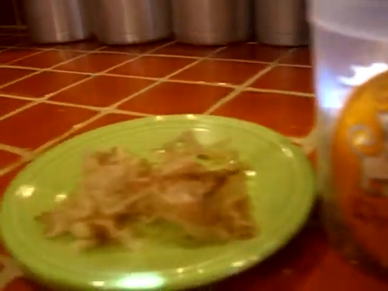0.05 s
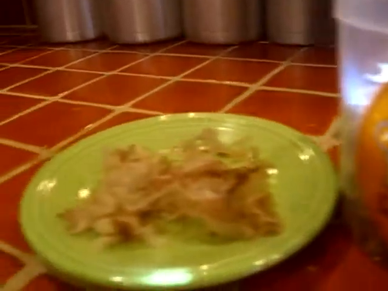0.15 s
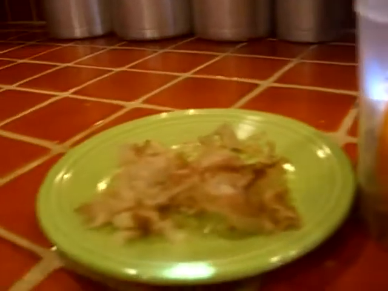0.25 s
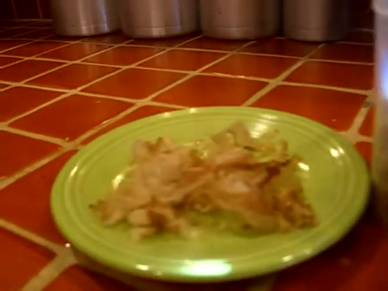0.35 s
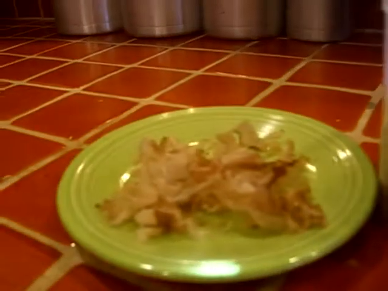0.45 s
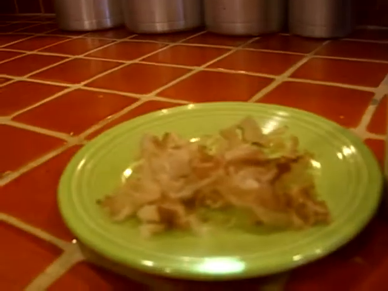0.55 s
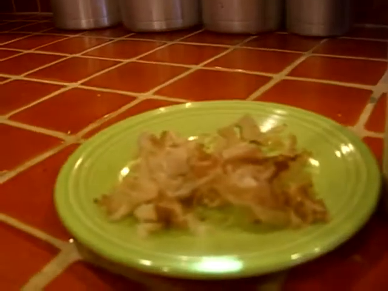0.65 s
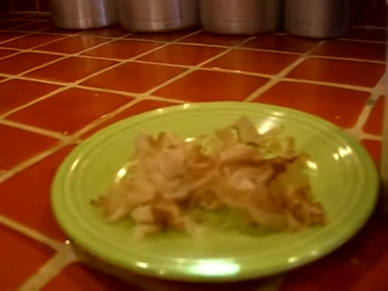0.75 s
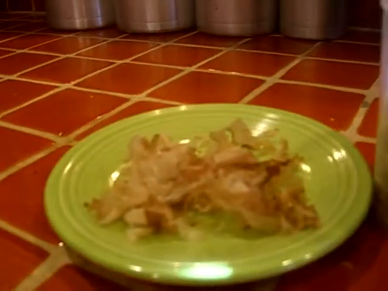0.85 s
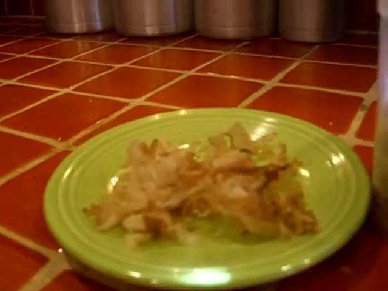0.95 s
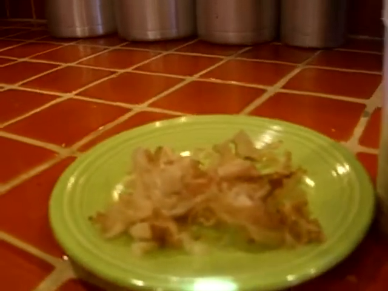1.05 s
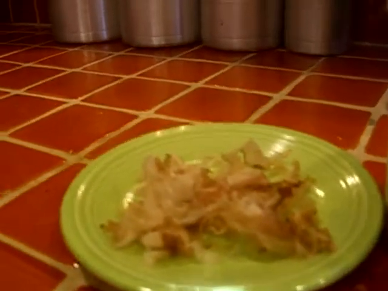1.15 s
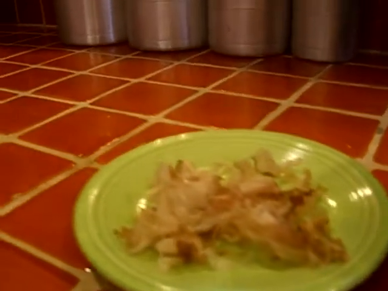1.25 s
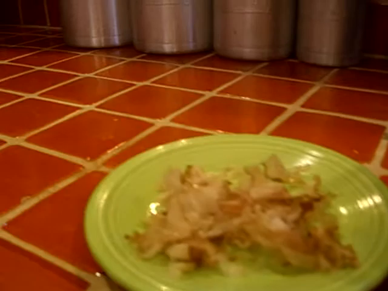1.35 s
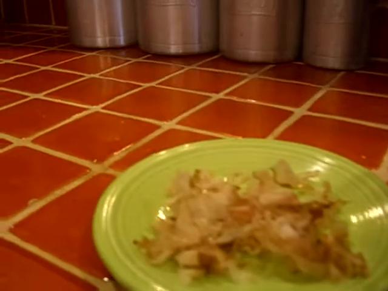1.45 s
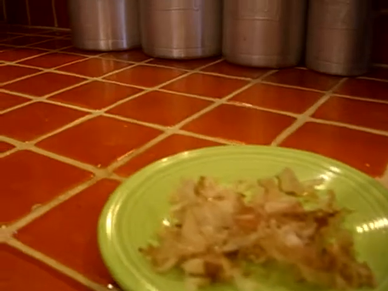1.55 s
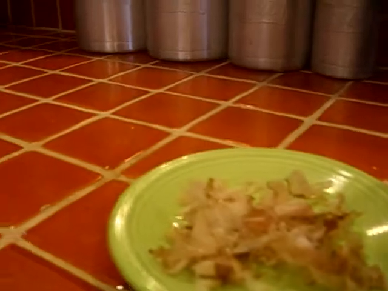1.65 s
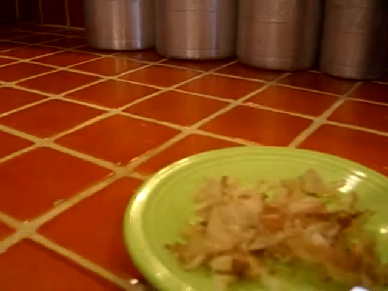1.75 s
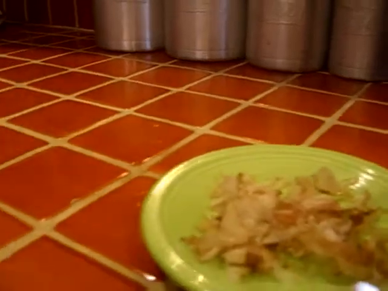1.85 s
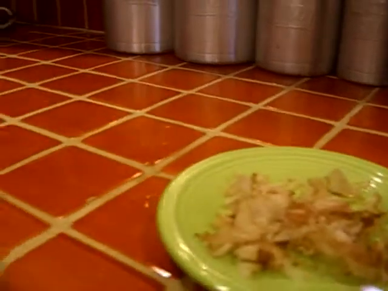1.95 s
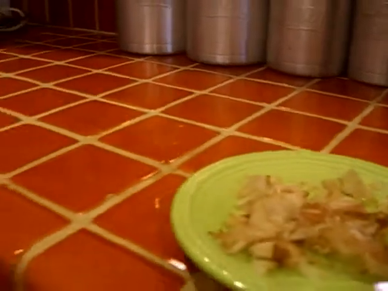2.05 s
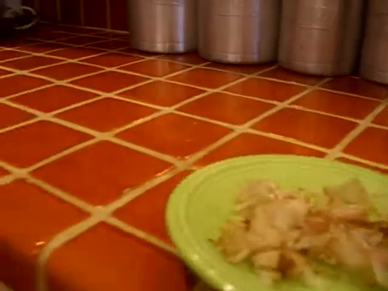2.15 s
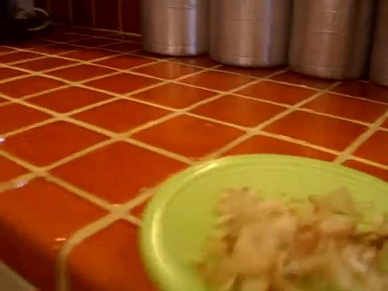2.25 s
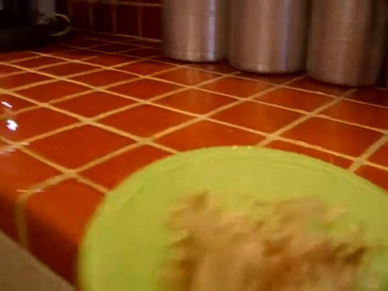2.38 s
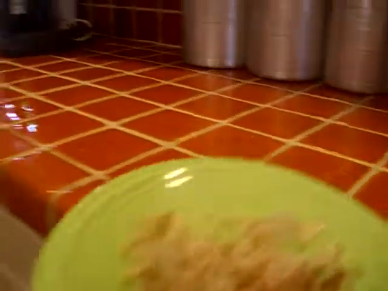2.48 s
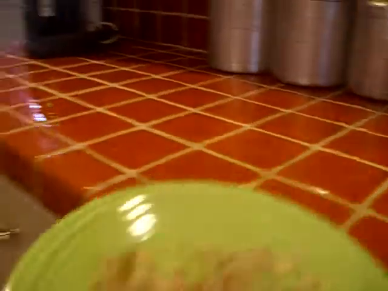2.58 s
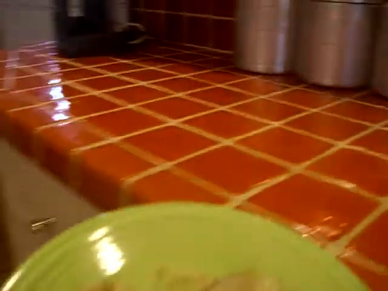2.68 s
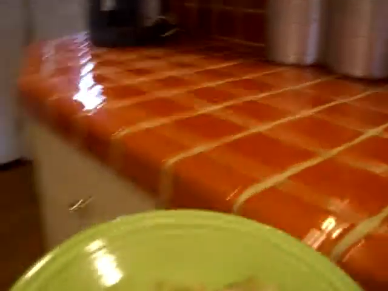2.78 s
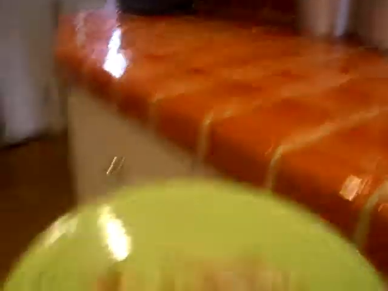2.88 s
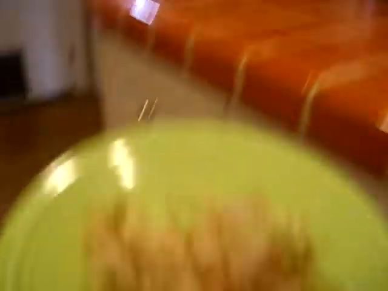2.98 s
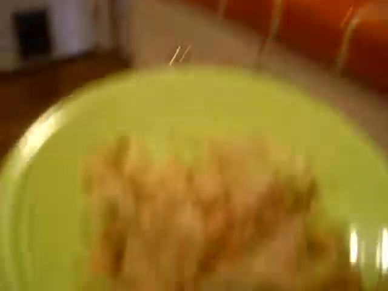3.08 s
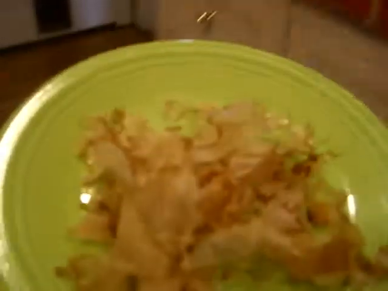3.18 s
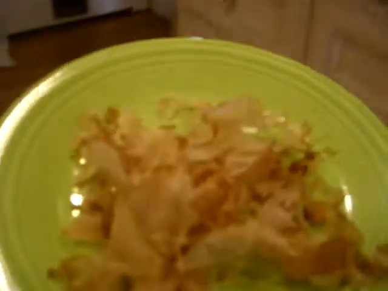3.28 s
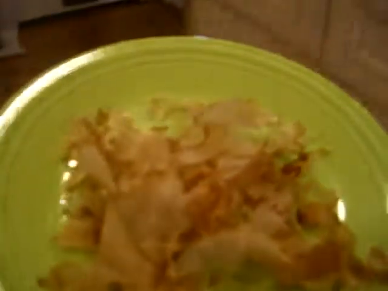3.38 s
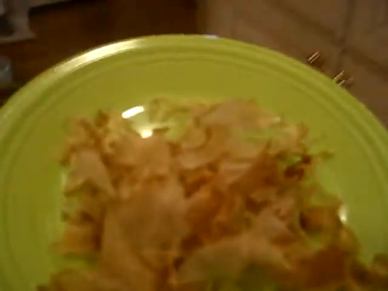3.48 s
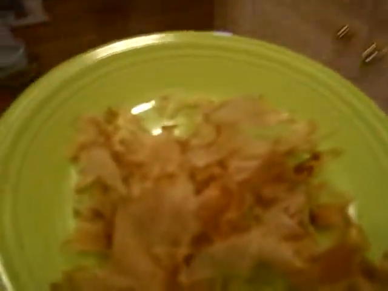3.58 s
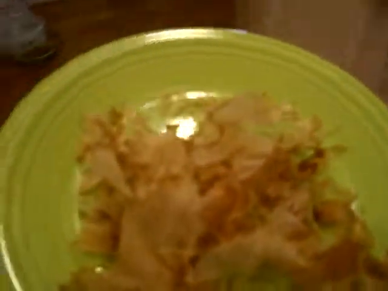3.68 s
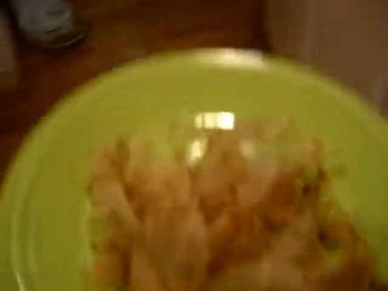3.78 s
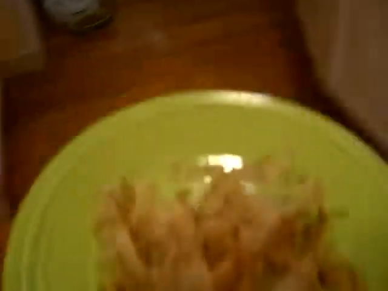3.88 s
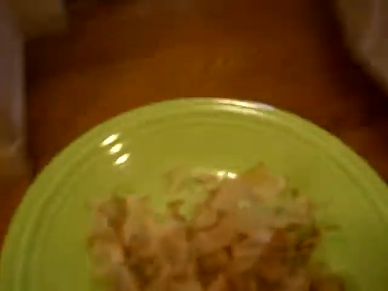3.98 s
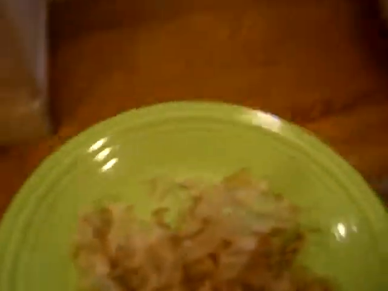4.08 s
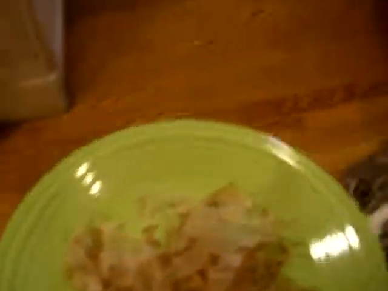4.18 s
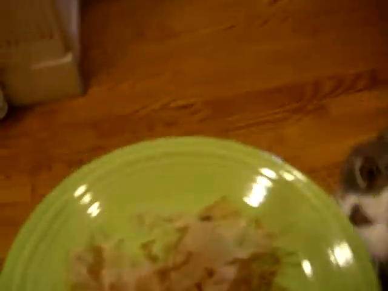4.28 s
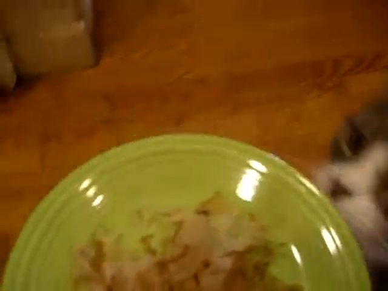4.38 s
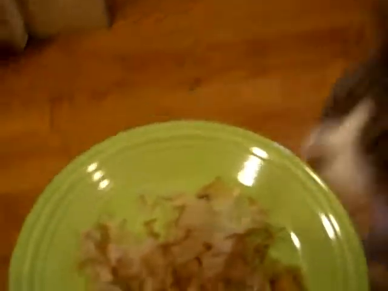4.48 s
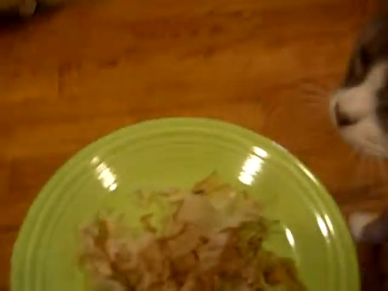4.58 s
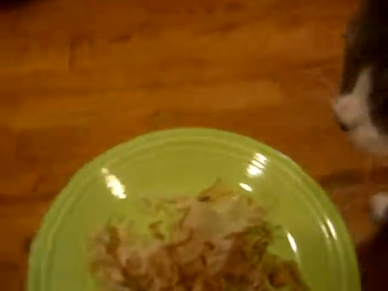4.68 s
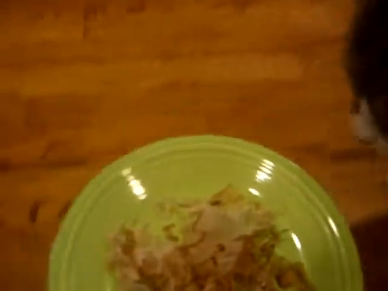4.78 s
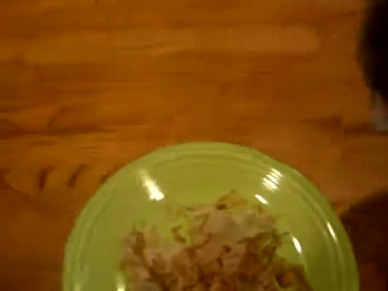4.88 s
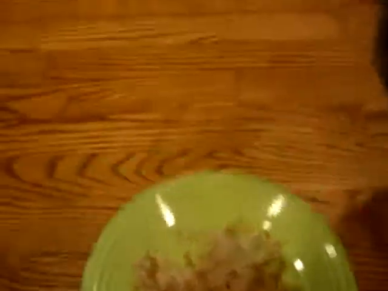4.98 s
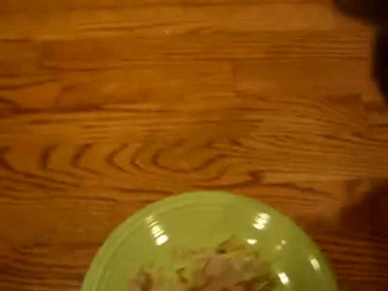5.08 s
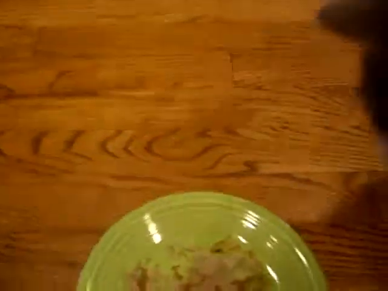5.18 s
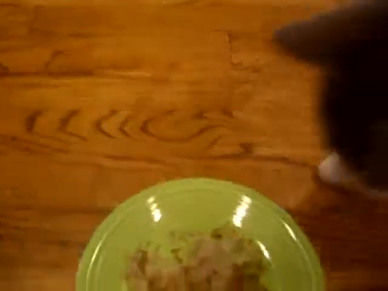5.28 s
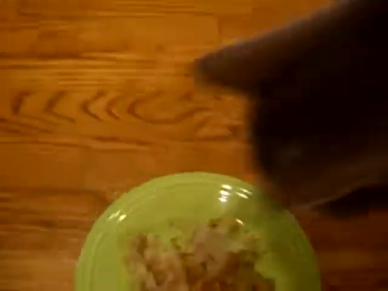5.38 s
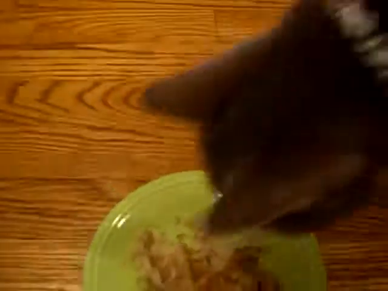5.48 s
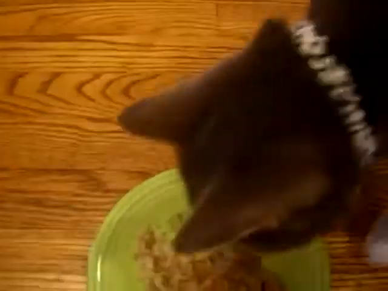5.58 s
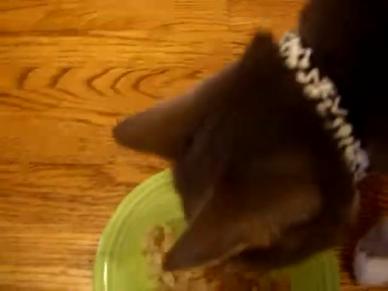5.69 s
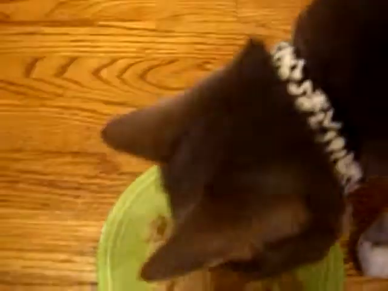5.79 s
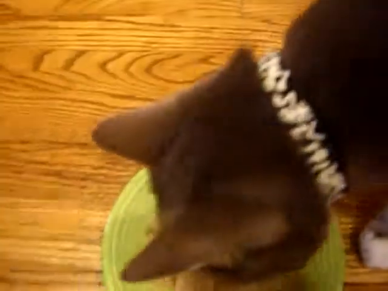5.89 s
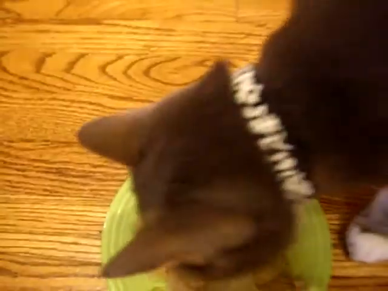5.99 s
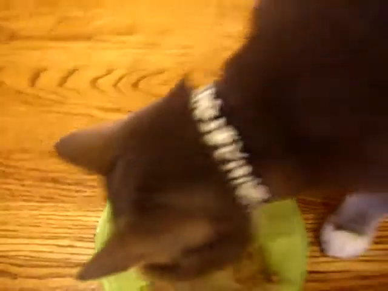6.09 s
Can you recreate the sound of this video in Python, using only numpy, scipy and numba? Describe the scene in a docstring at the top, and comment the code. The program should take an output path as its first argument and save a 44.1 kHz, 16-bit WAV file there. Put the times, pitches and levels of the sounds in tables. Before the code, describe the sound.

Quiet kitchen hum and thin electronic whine, a plate clinking off tile, light footsteps, then a sharp snap and hard, rocking plate impacts on floorboards.

```python
"""Fridge and mains hum, room air, a thin camera whine and faint ticks come first; then a ceramic plate is
dragged off a tiled counter, carried, and set down on a wooden floor where it bounces and rocks. Plate, knocks
and ticks are pushes or noise bursts through resonances, with decaying noise as the room; snaps are dry, air and
rustle are shaped noise, hum and whine are sines. Gain control ducks after loud blows."""
import sys
import numpy as np
from scipy import signal
from scipy.fft import rfft, irfft, next_fast_len
from scipy.io import wavfile
from scipy.ndimage import minimum_filter1d, map_coordinates
from numba import njit

SR = 44100
rng = np.random.default_rng(int(sys.argv[2]) if len(sys.argv) > 2 else 0)


def dump_mix(stems):
    """Bounce the given channels to the path in sys.argv[1] as a 16-bit WAV at rate SR."""
    frames = np.atleast_2d(stems).T  # one column per channel
    limited = np.clip(frames, -1, 1)  # hard clip at full scale
    pcm = np.round(limited * 32767).astype(np.int16)
    wavfile.write(sys.argv[1], SR, pcm)


N = 270774
TOP_HZ = 15760  # upper band limit


def amp(db):
    """Amplitude ratio of a level in dB."""
    return 10 ** (np.asarray(db) / 20)


def unit(x):
    """x scaled to an rms of 1."""
    return x / np.sqrt(np.mean(x ** 2) + 1e-20)


def along(points, hz):
    """Interpolate (Hz, value) points on a log frequency axis."""
    point_hz, values = np.transpose(points)
    return np.interp(np.log(hz + 1), np.log(point_hz + 1), values)


def curves(rows):
    """One value per sample for each column after the time."""
    s, *columns = np.transpose(rows)
    return [np.interp(np.arange(N) / SR, s, column) for column in columns]


def wobble(knots_per_s):
    """A smooth random curve through Gaussian knots."""
    knots = rng.standard_normal(int(N * knots_per_s / SR) + 4)
    return map_coordinates(knots, [np.arange(N) * knots_per_s / SR])


def filtered(x, response):
    """Multiply the spectrum of x by a response of frequency."""
    size = next_fast_len(len(x) + 8192)
    spectrum = rfft(x, size) * response(np.fft.rfftfreq(size, 1 / SR))
    return irfft(spectrum, size)[:len(x)]


def peak(f, hz, width_hz):
    """One causal resonance of height 1."""
    return 1j * f * width_hz / (hz * hz - f * f + 1j * f * width_hz)


def add(track, s, sound):
    """Mix a sound in at s seconds."""
    part = track[round(s * SR):][:len(sound)]
    part += sound[:len(part)]


# Kitchen decay. Each row: frequency in Hz, t60 in s.
KITCHEN_T60 = [(150, 0.45), (500, 0.3), (2000, 0.3), (8000, 0.27), (15000, 0.37)]


def echoed(sound, gap_s):
    """The room's answer: a new noise tail each time, every frequency dying at its own speed."""
    hz, t, z = signal.stft(rng.standard_normal(SR // 2), SR, nperseg=256)
    decay = amp(-60 * t / along(KITCHEN_T60, hz)[:, None])
    tail = signal.istft(z * decay, SR, nperseg=256)[1]
    tail = tail * (1 - np.exp(-np.arange(len(tail)) / SR / gap_s))
    return signal.fftconvolve(sound, tail / np.linalg.norm(tail))[:SR // 2]


def dying(modes, t60_s, t):
    """Noise in a few broad resonances with a dark top, dying away."""
    def shape(f):
        # alternating signs between neighbouring modes
        total = sum((-1) ** k * amp(db) * peak(f, hz, width_hz) for k, (hz, width_hz, db) in enumerate(modes))
        return total / (1 + (f / 2600) ** 4)

    noise = unit(filtered(rng.standard_normal(len(t)), shape))
    return noise * amp(-60 * t / t60_s) * (1 - np.exp(-t / 0.0015))


# Plate contacts. Each row: start in s, blow level in dB, hardness in Hz, ring level in dB re blow,
# rumble level in dB re blow, chatter span in s.
PLATE_CONTACTS = [(1.795, -28, 1570, -26.5, -8.5, .04), (1.86, -35.5, 2050, -24, -12, 0.054),
                  (1.928, -28, 2470, -40, -10, .04), (1.9947, -5, 3450, -33.5, -17.5, .01),
                  (2.016, -25.5, 2500, -13.5, -14, 0.015), (2.043, -27.5, 2500, -17, -10, .02),
                  (5.4653, 12, 7000, -41, -25, 0), (5.5238, 9, 3000, -41, -29, 0),
                  (5.5466, 2, 2900, -50, -27, 0), (5.5566, -2, 2500, -48, -26, 0),
                  (5.602, -10, 2900, -46, -18, 0), (5.6622, -2, 2300, -50, -20, 0),
                  (5.6765, 8, 5000, -36, -23, 0), (5.684, -14.5, 2000, -46, -6, .012),
                  (5.719, -13, 1500, -50, -11, 0.031), (5.904, -26.5, 2520, -49, -19.5, .004)]
# Ceramic ring modes. Each row: frequency in Hz, mean level in dB, t60 in s.
CERAMIC_MODES = [(1098, -1, .17), (2190, -11, .17), (3262, -8, .22), (3590, -15, .2), (4705, -5, .19),
                 (4737, -3, .15), (5400, -20, .15), (6115, -14, .11), (6998, -4, .16), (7020, -9, .18),
                 (8398, -18, .2), (10020, -14, .2), (11690, -15, .15), (11975, -18, .15), (13150, -18, .11)]
# Rumble of counter and boards. Each row: centre in Hz, width in Hz, relative level in dB.
SURFACE_MODES = [(595, 120, 4), (1110, 206, 2.5), (1460, 690, -2.5), (2340, 690, -6.5), (3720, 1200, -8.5)]
# Hollow bass of the surfaces. Each row: centre in Hz, width in Hz, relative level in dB.
BOOM_MODES = [(187, 47, -4), (269, 93, 3), (342, 111, 2), (434, 138, -4.5)]
CARRY_S = 2.3  # contacts before this are on the counter, later ones on the floor
TILE_BOOM_DB, BOARD_BOOM_DB = -10, 1  # re rumble
THUD_SHARE, THUD_TOP_HZ = .4, 1200  # thud pitch as a share of hardness, and its limit
FLEX_HZ, FLEX_WIDTH_HZ, FLEX_LOW_CUT_HZ = 316, 110, 123
FLEX_DB = 9.5  # re boom, before low cut and decay


def surface_flex(t):
    """The surface gives once under a blow: a decaying sine with its lows cut."""
    flex = amp(FLEX_DB) * np.sin(2 * np.pi * FLEX_HZ * t) * np.exp(-np.pi * FLEX_WIDTH_HZ * t)
    return filtered(flex, lambda f: (1j * f / (FLEX_LOW_CUT_HZ + 1j * f)) ** 2)


def contact_thud(hard_hz, t):
    """About one cycle of thud; a harder contact is higher, brighter and quicker to build."""
    thud_hz = min(THUD_SHARE * hard_hz, THUD_TOP_HZ)
    thud = -np.cos(2 * np.pi * thud_hz * t) * np.exp(-t * thud_hz * 1.3)
    thud = thud * 1.3 * (1 - np.exp(-t * hard_hz * 2))
    return filtered(thud, lambda f: 1j * f / (200 + 1j * f) / (1 + 1j * f / hard_hz) ** 3)


def ceramic_ring(t):
    """Decaying sines with random level offsets; rocking blurs each mode's pitch."""
    ring = np.zeros(len(t))
    for hz, level_db, t60_s in CERAMIC_MODES:
        envelope = amp(level_db + rng.normal(0, 4.4) - 60 * t / t60_s)
        phase_drift = .015 * np.cumsum(rng.standard_normal(len(t)))
        ring += envelope * np.sin(2 * np.pi * hz * t + phase_drift)
    return ring * (1 - np.exp(-t / 0.00015))


def plate():
    """Each contact is a push or a chatter of pushes driving thud, surface rumble and boom, and ceramic ring."""
    out, t = np.zeros(N), np.arange(SR // 2) / SR
    flex = surface_flex(t)
    for s, blow_db, hard_hz, ring_db, rumble_db, chatter_s in PLATE_CONTACTS:
        when, size = rng.random((2, 8))
        pushes = np.zeros(len(t))
        pushes[(when * chatter_s * SR).astype(int)] = .6 * size
        pushes[0] = 1
        thud = signal.fftconvolve(pushes, contact_thud(hard_hz, t))[:len(t)]
        boom_db = TILE_BOOM_DB if s < CARRY_S else BOARD_BOOM_DB
        rumble = dying(SURFACE_MODES, 0.15, t)
        boom = amp(boom_db) * (dying(BOOM_MODES, 0.21, t) + flex)
        response = amp(rumble_db) * (rumble + boom) + amp(ring_db) * ceramic_ring(t)
        body = signal.fftconvolve(pushes, response)[:len(t)]
        room = amp(-11.5) * echoed(body, gap_s=0.013)
        add(out, s, amp(blow_db) * (thud + body + room))
    return out


# Dry snaps. Each row: start in s, peak level in dB, brightness in dB per octave about 4 kHz, scatter in s.
SNAPS = [(5.3260, -21, 19, .0007), (5.3683, -1, 0, .0008)]
# Casing resonances. Each row: centre in Hz, width in Hz, level in dB at a width of 1000 Hz.
CASING_MODES = [(1080, 380, -1), (2800, 500, -7), (4800, 900, 5), (8000, 2400, -3), (11600, 1700, -11)]


def snaps():
    """Near, dry, brittle cracks: slips as a decaying noise burst ring a small casing."""
    out, t = np.zeros(N), np.arange(1024) / SR
    for s, peak_db, tilt_db, scatter_s in SNAPS:
        slips = 0.52 * rng.standard_normal(len(t)) * np.exp(-t / scatter_s)
        slips[0] = -1

        def casing(f):
            total = 0
            for hz, width_hz, level_db in CASING_MODES:
                gain = amp(level_db + tilt_db * np.log2(hz / 4000)) * 1000 / width_hz
                total = total + gain * peak(f, hz, width_hz)
            return total / (1 + 1j * f / 12000) ** 4

        crack = filtered(slips, casing)
        add(out, s, amp(peak_db) * crack / np.abs(crack).max())
    return out


# Knocks of feet and paws. Each row: start in s, direct peak level in dB, centre in Hz, width in Hz,
# room level in dB re direct.
KNOCKS = [(0.9995, -30.5, 1120, 1500, 8.5), (3.101, -25, 1780, 2750, 2), (3.746, -30, 580, 277, 2),
          (3.766, -41, 603, 300, 1), (4.104, -20.5, 1860, 1180, -5), (4.106, -28.5, 786, 300, -5),
          (4.654, -36, 1090, 300, -8), (4.779, -25.5, 770, 374, -5), (5.257, -34, 640, 400, -15)]


def knocks():
    """Crisp knocks of feet and paws: one short push into one resonance, then the room."""
    out, t = np.zeros(N), np.arange(SR // 2) / SR
    for s, peak_db, hz, width_hz, room_db in KNOCKS:
        knock = filtered(np.exp(-t / .0001), lambda f: peak(f, hz, width_hz) * peak(f, hz, 2 * width_hz))
        knock = knock / np.abs(knock).max()
        add(out, s, amp(peak_db) * (knock + amp(room_db) * echoed(knock, gap_s=0.002)))
    return out


# Faint ticks around the room. Each row: start in s, level in dB, centre in Hz, width in Hz.
TICKS = [(.268, -49.5, 2800, 600), (0.351, -47.5, 2580, 600), (.351, -43.5, 8140, 2200),
         (.433, -45, 1930, 700), (1, -47, 2940, 3000), (1.028, -43, 6900, 1500), (1.568, -43, 4670, 1290),
         (1.734, -51, 410, 310), (2.089, -45, 8800, 3000), (2.351, -50, 5940, 900),
         (2.438, -38.5, 2500, 685), (2.493, -45, 7900, 1500), (2.755, -44.5, 5500, 2000),
         (2.806, -42, 585, 600), (2.806, -45, 7600, 1600), (3.11, -43.5, 865, 1000),
         (3.127, -42.5, 12900, 1500), (3.126, -44, 7140, 2200), (3.436, -38, 875, 1200),
         (3.44, -41.5, 3380, 2200), (3.523, -36, 2710, 670), (3.531, -38, 880, 795),
         (3.817, -42.5, 8300, 1500), (4.109, -44.5, 3970, 3000), (4.79, -46.5, 8000, 1500)]
# Fainter ticks at chance moments: mean level and centre, with their random spreads.
STRAY_COUNT, STRAY_DB, STRAY_SPREAD_DB = 22, -54, 1.5
STRAY_HZ, STRAY_SPREAD_OCTAVES, STRAY_WIDTH_HZ = 2850, 0.67, 1000


def stray_ticks():
    """Rows for ticks with random time, level and centre."""
    moments = rng.random(STRAY_COUNT) * N / SR
    draws = rng.standard_normal((STRAY_COUNT, 2))
    rows = []
    for s, (level_draw, pitch_draw) in zip(moments, draws):
        hz = min(STRAY_HZ * 2 ** (STRAY_SPREAD_OCTAVES * pitch_draw), TOP_HZ)
        rows.append((s, STRAY_DB + STRAY_SPREAD_DB * level_draw, hz, STRAY_WIDTH_HZ))
    return rows


def ticks():
    """Small far clicks: noise bursts in one broad resonance, mostly heard through the room."""
    out, t = np.zeros(N), np.arange(SR // 2) / SR
    for s, db, hz, width_hz in TICKS + stray_ticks():
        click = rng.standard_normal(len(t)) * amp(-60 * t / 0.036) * (1 - np.exp(-t / 0.0033))
        click = filtered(click, lambda f: peak(f, hz, width_hz) * peak(f, hz, 2 * width_hz))
        click = click / np.linalg.norm(click) * 10
        add(out, s, amp(db) * (click + amp(3.5) * echoed(click, gap_s=0.00057)))
    return out


def shaped_noise(spectrum):
    """Unit-rms noise with the given relative spectrum."""
    return unit(filtered(rng.standard_normal(N), lambda f: amp(along(spectrum, f))))


# Clothes and hands. Each row: frequency in Hz, relative density in dB per Hz.
RUSTLE_SPECTRUM = [(1500, 0), (3000, 1), (6000, -4), (9000, 5), (13000, -3), (16000, -17)]
# Rustle level. Each row: time in s, mean level in dB rms.
RUSTLE_LEVEL = [(0, -68.5), (1.6, -59), (2.2, -80), (3.5, -54), (4.1, -62), (4.9, -55.5), (5.4, -66),
                (6.14, -53.5)]


def rustle():
    """Clothes and hands: shaped noise that swells with the walk."""
    (level_db,) = curves(RUSTLE_LEVEL)
    return amp(level_db + 1.4 * wobble(5.72)) * shaped_noise(RUSTLE_SPECTRUM)


# Hum tones, frequencies in Hz: 81.5 and 163 from the fridge, 119.8 and 360.3 from the mains.
HUM_HZ = (81.5, 119.8, 163, 360.3)
# Hum at spots along the walk. Each row: time in s, then the mean peak level of each tone in dB.
HUM_LEVELS = [(0, -48, -61, -63, -57), (.35, -60.5, -59.5, -63.5, -56.5), (1.15, -52, -59.5, -63, -57.5),
              (1.9, -65, -58.5, -65, -59), (2.7, -75, -62, -58, -61), (3.2, -77, -55.5, -57, -55.5),
              (3.8, -57, -59.5, -52, -59), (4.5, -66, -55, -54.5, -67), (5.1, -55, -56.5, -61.5, -56),
              (5.4, -58.5, -63, -59, -84)]
HUM_WAVER_DB, HUM_BLUR_RAD_PER_HZ = 2.2, .006  # level and phase sway


def fridge_and_mains_hum():
    """Sines whose levels change from spot to spot, with wavering level and phase."""
    out, t = np.zeros(N), np.arange(N) / SR
    for hz, level_db in zip(HUM_HZ, curves(HUM_LEVELS)):
        level = amp(level_db + HUM_WAVER_DB * wobble(4))
        out += level * np.sin(2 * np.pi * hz * t + HUM_BLUR_RAD_PER_HZ * hz * wobble(9))
    return out


# Room air and hiss. Each row: frequency in Hz, relative density in dB per Hz.
AIR_SPECTRUM = [(13, -28), (25, -4.5), (60, -10), (130, -10.5), (300, -6.5), (650, -10.5), (1300, -17),
                (2500, -21), (4500, -26), (8000, -24.5), (12000, -26.5), (16000, -23.5)]
# Air level. Each row: time in s, mean level in dB rms.
AIR_LEVEL = [(0, -49.5), (2, -48.5), (5.3, -46.5), (5.7, -43.5), (6.14, -43)]


def room_air():
    """Shaped noise with a slow swell and slight level sway."""
    (level_db,) = curves(AIR_LEVEL)
    return amp(level_db + 0.28 * wobble(11)) * shaped_noise(AIR_SPECTRUM)


# Camera whine. Each row: multiple of WHINE_HZ, level in dB rms.
WHINE = [(1, -54.8), (2, -56.6)]
# Thin steady camera tones. Each row: frequency in Hz, level in dB rms.
TONES = [(6525.5, -83), (6552, -79), (6578.5, -69.5), (6605, -69.5), (6631.5, -80), (13183.7, -59)]
WHINE_HZ, FRAME_HZ = 7522.5, 29.97


def whine():
    """A tone and its octave whose phase slides back and resets once a frame, plus thin steady tones."""
    t = np.arange(N) / SR
    slide = sum(.42 / k * np.sin(2 * np.pi * k * FRAME_HZ * t) for k in range(1, 7))
    out = sum(amp(db) * np.sin(k * (2 * np.pi * WHINE_HZ * t + slide)) for k, db in WHINE)
    thin = sum(amp(db) * np.sin(2 * np.pi * (hz * t + rng.random())) for hz, db in TONES)
    return np.sqrt(2) * (out + thin)  # rms to peak


def scene():
    """Sum all sources into two equal channels."""
    events = plate() + snaps() + knocks() + ticks()
    mono = events + rustle() + fridge_and_mains_hum() + room_air() + whine()
    return np.array([mono, mono])


@njit
def ducking(over_db, grab, quick, charge, slow):
    """A quick stage grabs peaks and falls steadily; a slow stage charges from it and holds longer."""
    out = np.zeros(len(over_db))
    a = b = 0.0
    for i in range(len(over_db)):
        a = a + (over_db[i] - a) * grab if over_db[i] > a else max(a - quick, 0.0)
        b += (a - b) * (charge if a > b else slow)
        out[i] = max(a, b)
    return out


THRESHOLD_DB, CEILING = -11, .69
GRAB_S, QUICK_DB_PER_S, CHARGE_S, SLOW_S = .0007, 95, .12, .25


def record(dry):
    """Gain control, a firm ceiling for what slips past it, and the band limit."""
    held = -minimum_filter1d(-np.abs(dry[0]), size=89, origin=44)  # hold each peak 2 ms
    over_db = np.maximum(20 * np.log10(held + 1e-9) - THRESHOLD_DB, 0)
    step = lambda s: 1 / (s * SR)
    duck_db = ducking(over_db, step(GRAB_S), QUICK_DB_PER_S / SR, step(CHARGE_S), step(SLOW_S))
    x = dry[0] * amp(-duck_db)
    x = x / (1 + np.abs(x / CEILING) ** 8) ** (1 / 8)
    x = filtered(x, lambda f: f < TOP_HZ)
    return np.array([x, x])


dry = scene()
out = record(dry)
dump_mix(out)
```